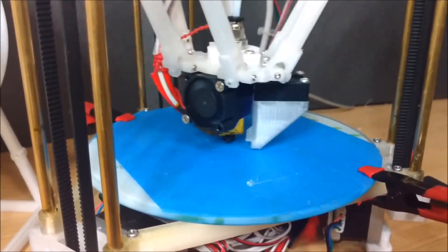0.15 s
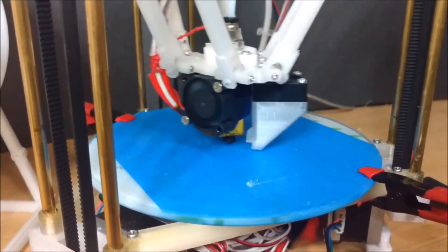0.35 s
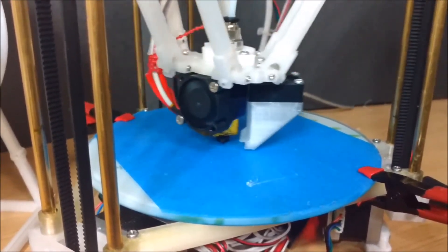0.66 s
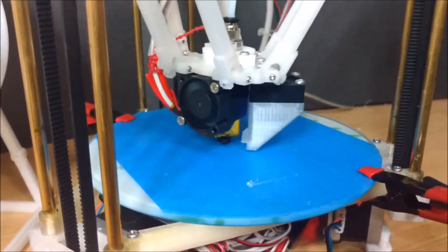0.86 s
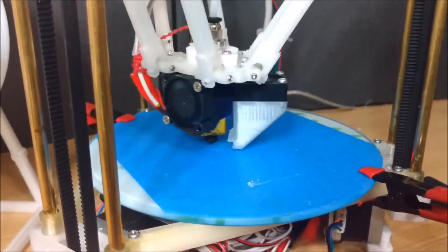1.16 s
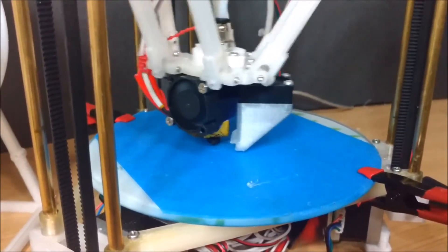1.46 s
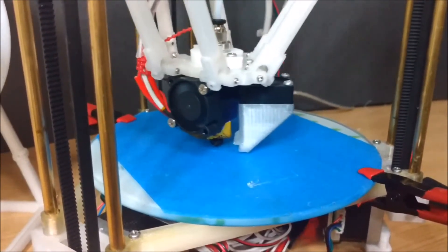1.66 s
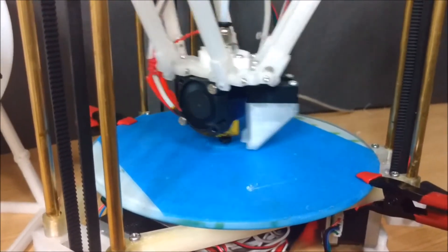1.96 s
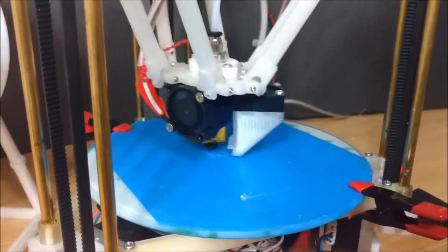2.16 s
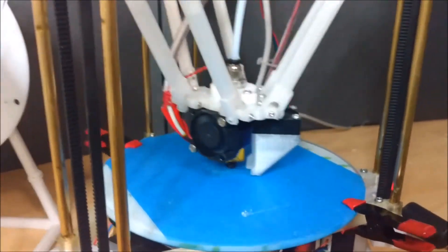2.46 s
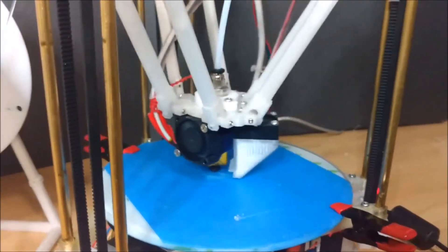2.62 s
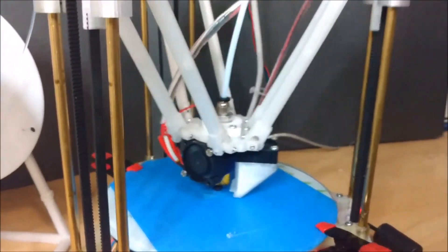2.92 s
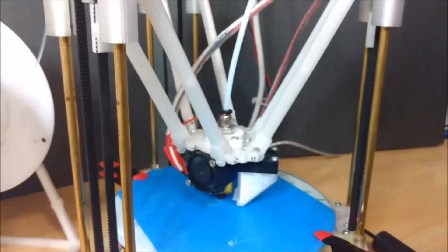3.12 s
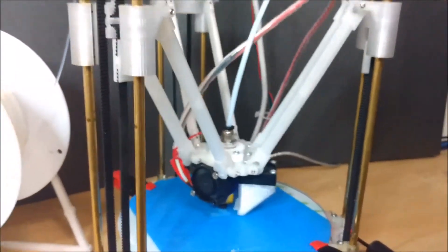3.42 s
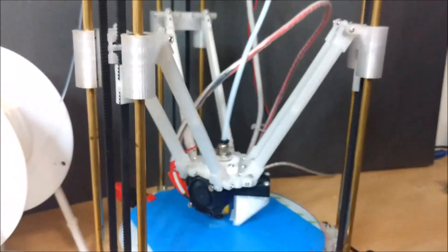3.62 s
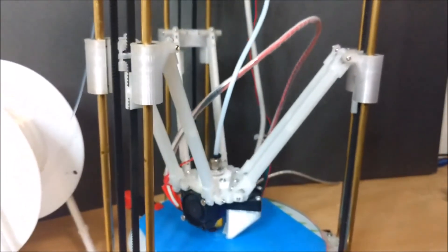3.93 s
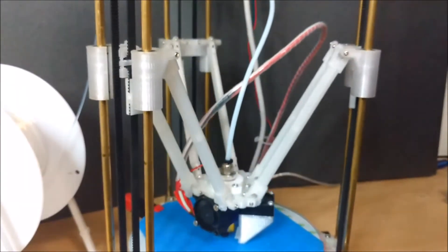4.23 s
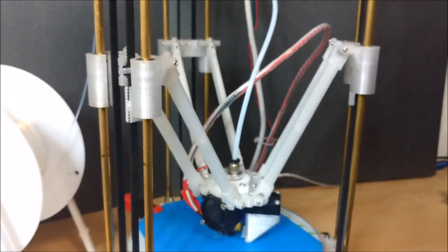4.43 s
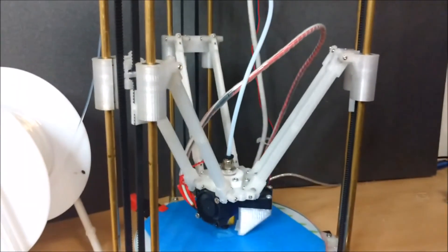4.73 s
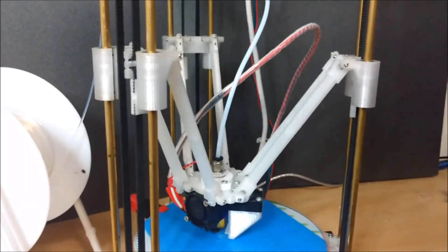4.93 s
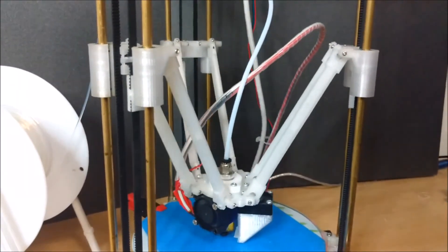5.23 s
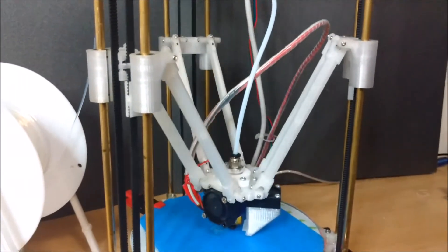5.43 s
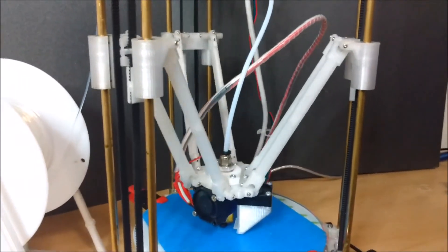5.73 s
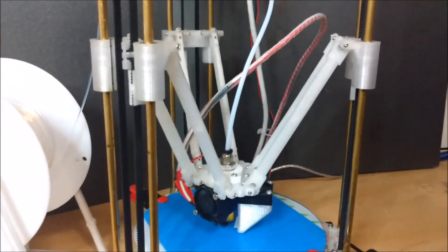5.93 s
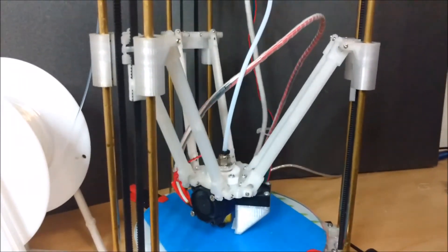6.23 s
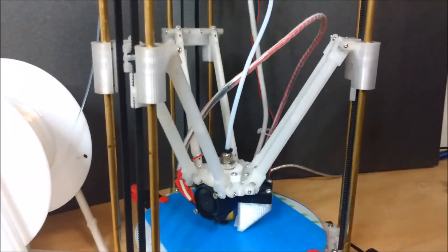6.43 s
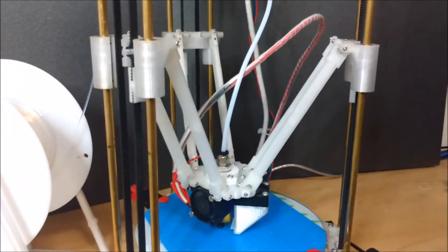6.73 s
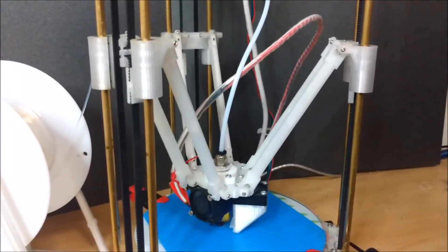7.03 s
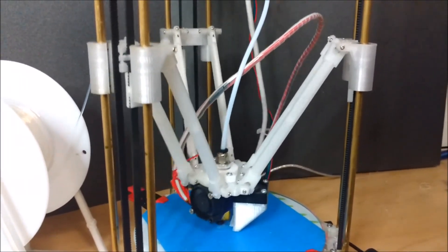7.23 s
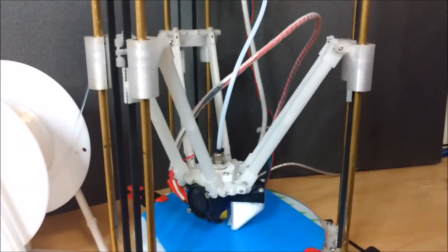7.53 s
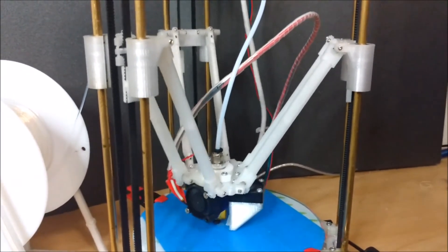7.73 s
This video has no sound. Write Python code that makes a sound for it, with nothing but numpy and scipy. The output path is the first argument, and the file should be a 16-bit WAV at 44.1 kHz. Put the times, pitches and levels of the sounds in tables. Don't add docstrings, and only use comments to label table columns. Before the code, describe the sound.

A desktop 3D printer with three towers is heard close up across a table, wide in stereo, with a very short room echo. A soft low fan rush runs throughout, with a barely audible whine. From 0 s the head makes brief strokes, about eight a second: each a low wavering motor hum near 185 Hz, with plastic arm buzz, bright metallic rattle and small dry knocks at reversals. The strokes quicken and weaken until 1.85 s. At 1.9 s a firmer run begins, again quickening, with a dull frame bump near 3.6 s. From 3.9 to 5.6 s it is quieter, lower-pitched and irregular, with a tiny scratchy bearing chirp around 4.2-4.4 s. At 5.7 s strong, fast paired strokes return, knocking most around 6.1 s, then gradually lengthening and spacing out to eight strokes a second, continuing to the end at about 7.9 s.

```python
import sys
import numpy as np
from scipy import signal
from scipy.fft import rfft, irfft, next_fast_len
from scipy.io import wavfile

SR = 44100
rng = np.random.default_rng(int(sys.argv[2]) if len(sys.argv) > 2 else 0)


def transcribe(u):
    v = np.clip(np.atleast_2d(u).T, -1, 1)
    q = np.round(v * 32767).astype(np.int16)
    wavfile.write(sys.argv[1], SR, q)


def field_ratio(decibels):
    return 10 ** (np.asarray(decibels, dtype=float) / 20)


N = 347067
HZ = np.maximum(np.fft.rfftfreq(next_fast_len(N + SR // 2), 1 / SR), 1)

# frequency_hz, density_db
FAN_SPECTRUM = [(25, 5), (80, -13), (130, 17.5), (300, 1), (1000, -16), (3000, -11.5), (6000, -32),
                (15000, -64)]
# frequency_hz, width_hz, level_db
BLADE_TONES = [(1488, 25, -60), (3023, 44, -55.5)]
# time_s, level_db
CREEP = [(0.0, -43), (0.39, -43), (1.1, -43.5), (1.84, -44.5), (1.99, -40), (2.35, -47), (2.76, -43.5),
         (3.29, -45.5), (3.72, -45.5), (4.2, -45.5), (4.36, -43.5), (4.43, -54.5), (4.54, -45),
         (4.93, -44.5), (5.6, -46), (5.87, -42.5), (6.6, -44), (7.87, -43)]
# mean_db, swing_ratio
CREEP_LAYERS = [
    (-46.5, 1.2),
    (-43, 1.3),
    (-47.5, 1.2),
]
# start_s, length_s, shake_db, hum_db
FILL_A = [(0.005, 0.035, -31, -28.5), (0.122, 0.087, -33, -34), (0.258, 0.061, -35, -31.5),
          (0.387, 0.084, -33.5, -32), (0.523, 0.043, -31.5, -33), (0.638, 0.064, -32, -33),
          (0.762, 0.034, -33.5, -29.5), (0.87, 0.038, -32.5, -29), (0.959, 0.054, -35.5, -38),
          (1.071, 0.034, -31, -32), (1.177, 0.028, -31.5, -31.5), (1.263, 0.032, -30.5, -33.5),
          (1.354, 0.034, -37, -34.5), (1.44, 0.025, -33.5, -38.5), (1.501, 0.05, -37, -38.5),
          (1.591, 0.06, -42.5, -46), (1.731, 0.051, -41, -43.5), (1.801, 0.057, -48, -41.5)]
# start_s, length_s, shake_db, hum_db
FILL_B = [(1.922, 0.063, -28.5, -36), (2.03, 0.054, -30, -33), (2.147, 0.063, -31.5, -36),
          (2.27, 0.048, -32, -33), (2.392, 0.05, -35, -36), (2.51, 0.071, -33.5, -39.5),
          (2.631, 0.047, -33.5, -34.5), (2.739, 0.033, -28.5, -34.5), (2.84, 0.039, -37, -32.5),
          (2.933, 0.041, -31, -33), (3.036, 0.027, -33, -32.5), (3.115, 0.033, -31.5, -34.5),
          (3.208, 0.026, -39.5, -32.5), (3.28, 0.029, -33.5, -34), (3.365, 0.023, -38, -50.5),
          (3.425, 0.033, -40.5, -41.5), (3.492, 0.031, -38, -49), (3.586, 0.027, -40, -31.5),
          (3.637, 0.014, -32, -38), (3.689, 0.048, -32.5, -37)]
# start_s, length_s, shake_db, hum_db
OUTLINE = [(3.928, 0.02, -54, -42.5), (4.02, 0.065, -48, -42.5), (4.107, 0.043, -42.5, -47),
           (4.228, 0.034, -40, -40.5), (4.326, .04, -55, -44.5), (4.465, 0.037, -40, -38.5),
           (4.583, 0.07, -49, -43), (4.676, 0.064, -51, -39.5), (4.775, 0.019, -33.5, -56.5),
           (4.833, 0.031, -37, -38.5), (5.035, 0.061, -44.5, -40), (5.134, 0.046, -40, -39.5),
           (5.226, .028, -36, -38.5), (5.308, 0.051, -37, -53.5), (5.408, 0.053, -40, -35.5),
           (5.502, 0.043, -45, -42.5), (5.573, 0.023, -41, -49)]
# start_s, length_s, shake_db, hum_db
FILL_C = [(5.678, 0.059, -33.5, -37), (5.738, 0.045, -30.5, -40), (5.822, 0.036, -30.5, -38),
          (5.875, 0.028, -32, -37.5), (5.945, .03, -34, -35.5), (5.988, 0.044, -31, -34),
          (6.087, 0.025, -28, -30), (6.14, 0.023, -27, -36), (6.214, 0.025, -29, -32.5),
          (6.262, 0.04, -30, -30.5), (6.347, .035, -31, -35.5), (6.4, 0.031, -33.5, -37),
          (6.474, 0.032, -32.5, -50), (6.518, 0.049, -30, -35), (6.61, 0.043, -31, -35.5),
          (6.658, 0.044, -31.5, -36.5), (6.747, 0.085, -30.5, -37), (6.877, 0.038, -32.5, -33.5),
          (6.931, 0.023, -30, -33), (7.008, 0.084, -31, -35), (7.15, 0.06, -32, -36.5),
          (7.264, 0.07, -30, -34.5), (7.39, .066, -34.5, -39), (7.497, 0.061, -31.5, -38),
          (7.598, .062, -33.5, -35.5), (7.714, 0.057, -29.5, -33.5), (7.818, 0.056, -31, -35.5)]
# moves, buzz_over_shake_db, rumble_db, pitch_hz, waver_ratio, three tower loads_db
PASSES = [
    (FILL_A, -0.4, -3, 186, 0.0361, 0, 0.1, 0.1),
    (FILL_B, -4, -2.6, 187, 0.04, 0.13, -0.1, 0.1),
    (OUTLINE, -5, 0.4, 150, 0.05986, 0.1, 1.11, -1.35),
    (FILL_C, -2, 0.99, 189, 0.0668, -1.7, 4.25, -5.5),
]
# left_lag_s, left_over_right_db
TOWERS = [(-.00013, -2.5), (.00003, 2.5), (.00017, -4)]
# frequency_hz, width_hz, level_db
FRAME_MODES = [(141.2, 11.6, 5.5), (189.6, 31.6, -1), (289.5, 74, -6.5), (329.6, 26, -6)]
# frequency_hz, width_hz, level_db
ARM_MODES = [(436, 16.6, 3.5), (545.5, 24.3, 0), (650, 40, 3), (973, 55, -3.5), (1081.5, 30, 2),
             (1200, 132, -3), (1398, 62, 3), (1513, 63, 0), (1697, 156, -7)]
# frequency_hz, width_hz, level_db
ROD_MODES = [(2170, 160, 8), (2800, 64, -18), (2990, 380, 21), (3630, 580, 4), (4944, 83, -22.5),
             (6000, 5800, -33.5)]
# frequency_hz, density_db
SCRAPE_SPECTRUM = [(200, 10), (700, 0), (1800, 0), (3500, 3), (6000, -2.5), (8000, -10), (11000, -11),
                   (15500, -42.5)]
# time_s, level_db
KNOCKS = [(0.131, -30), (0.3125, -27), (0.3605, -42), (0.394, -25), (0.4298, -17), (0.4708, -31),
          (0.5254, -26), (0.6332, -26), (0.6477, -24), (0.7477, -30), (0.7711, -30), (0.846, -32),
          (0.871, -22), (0.9567, -36), (1.073, -34), (1.084, -27), (1.124, -28), (1.1798, -31),
          (1.2635, -31), (1.276, -19), (1.3503, -30), (1.3769, -30), (1.4471, -30), (1.4994, -34),
          (1.733, -33), (1.9105, -25), (1.9295, -20), (2.036, -21), (2.156, -16), (2.2772, -20),
          (2.3298, -27), (2.389, -31), (2.5077, -38), (2.5225, -25), (2.585, -20), (2.6173, -32),
          (2.6344, -22), (2.749, -31), (2.793, -25), (2.8502, -27), (2.9392, -32), (3.045, -27),
          (3.08, -28), (3.1196, -29), (3.2205, -30), (3.2565, -35), (3.2764, -35), (3.2905, -30),
          (3.361, -34), (3.3729, -20), (3.3977, -36), (3.5047, -20), (3.5653, -21.5), (3.5957, -28),
          (3.647, -21), (3.696, -29), (3.714, -33), (3.7985, -23), (3.8372, -24.5), (3.8758, -39)]
# time_s, level_db
LATE_KNOCKS = [(3.9357, -27), (4.5816, -27), (4.5956, -30), (4.6803, -28), (4.7788, -38), (4.842, -37),
               (4.9482, -39), (5.1295, -22), (5.1591, -21.5), (5.219, -33), (5.234, -33), (5.2867, -32),
               (5.3245, -34), (5.413, -21), (5.449, -34), (5.501, -30), (5.5328, -25), (5.5571, -29),
               (5.6502, -26), (5.679, -37), (5.6915, -31), (5.7379, -23), (5.7594, -20), (5.8116, -39),
               (5.8293, -34), (5.9432, -24), (6.002, -30), (6.0766, -23), (6.097, -14), (6.1445, -31),
               (6.2126, -20), (6.2723, -23), (6.3345, -26), (6.3549, -33), (6.475, -26), (6.4892, -26),
               (6.5311, -21), (6.6081, -26), (6.6214, -20), (6.6618, -23), (6.7457, -17), (6.7842, -36),
               (6.8661, -36), (6.8827, -24), (7.013, -21), (7.1367, -21), (7.151, -28), (7.1764, -25),
               (7.2574, -20), (7.3856, -30), (7.4036, -25), (7.5012, -24.5), (7.5926, -30), (7.6196, -20),
               (7.6959, -26), (7.7145, -24.5), (7.7277, -27), (7.8141, -21)]
# time_s, level_db
SLIPS = [(4.2008, -36), (4.2093, -35), (4.2372, -23.5), (4.2408, -35), (4.2535, -34), (4.2614, -36),
         (4.2724, -37), (4.2844, -36), (4.301, -28), (4.313, -35), (4.3286, -32), (4.3381, -42),
         (4.3474, -38), (4.366, -42)]
# frequency_hz, width_hz, level_db
SLIP_MODES = [(3120, 65, 12.5), (6270, 340, -12)]

FAN_DB = -37
CREEP_MEAN_DB = -45
RISE_S, FALL_S, SAG_DB_PER_S = 0.0063, 0.01335, 4
RUMBLE_OF_HUM_DB = -6
HUM_DB, HUM_LAG_S, HUM_BUILD_HZ = 9.8, 0.0033, 18.18
OWN_MODES_DB = 6
POSE_DB, POSE_HZ = 2.5, 9
CLICK_DB, THUD_DB = -6, -13
KNOCK_S, SLIP_S = 0.002, 0.001
HARDEST_DB = -22
BUMP_S, BUMP_DB, BUMP_HZ, BUMP_WIDTH_HZ = 3.594, -24.5, 520, 500
SLIP_DB = 11
ROOM_T60_S, ROOM_DB = 0.13, -10.5
CROSS_S, CROSS_GAIN, CROSS_CUT_HZ = 0.00038, 0.85, 5300
TOP_HZ = 15300


def rms_one(x):
    return x / np.sqrt(np.mean(abs(x) ** 2) + 1e-20)


def through(x, response):
    size = 2 * (len(HZ) - 1)
    return irfft(rfft(x, size) * response, size)[..., :N]


def colour(points):
    hz, db = np.transpose(points)
    cepstrum = irfft(np.log(field_ratio(np.interp(np.log(HZ), np.log(hz), db))))
    cepstrum[1:len(HZ) - 1] *= 2
    cepstrum[len(HZ):] = 0
    return np.exp(rfft(cepstrum))


def modes(table):
    response = 0
    for k, (hz, width, db) in enumerate(table):
        detuning = (HZ / hz - hz / HZ) * hz / width
        response = response + (-1) ** k * field_ratio(db) / (1 + 1j * detuning)
    return response


def delay(s):
    return np.exp(-2j * np.pi * HZ * s)


def drift(hz):
    return rms_one(through(rng.standard_normal(N), 1 / (1 + 1j * HZ / hz) ** 2))


def ports(lag_s, pan_db):
    left = field_ratio(pan_db / 2) * delay(lag_s + 0.001)
    right = field_ratio(-pan_db / 2) * delay(0.001)
    return np.array([left, right])


def fan():
    shared, own = rng.standard_normal(N), rng.standard_normal((2, N))
    tint = colour(FAN_SPECTRUM)
    rush = through(shared, tint) + through(own, tint * (0.013 + 1 / (1 + 1500 / HZ)))
    tones = 0
    for hz, width, db in BLADE_TONES:
        tones = tones + field_ratio(db) * rms_one(through(shared, modes([(hz, width, 0)]) ** 2))
    return field_ratio(FAN_DB) * rms_one(rush) + tones


def printer():
    rattle, buzz, rumble, hum, (pitch_hz, waver, *loads_db) = effort()
    middle = field_ratio(HUM_DB) * motor_steps(hum, pitch_hz, waver) + frame_bump()
    out = through(middle, ports(0.00005, -0.26))
    for index, load_db in enumerate(loads_db):
        out += tower(index, rattle, buzz, rumble, load_db)
    return out


def effort():
    t = np.arange(N) / SR
    swing_db = np.interp(t, *np.transpose(CREEP)) - CREEP_MEAN_DB
    creeping = np.array([field_ratio(2 * (db + share * swing_db)) for db, share in CREEP_LAYERS])
    moving = np.zeros((3, N))
    held = np.zeros((6, N))
    for moves, buzz_db, *setting in PASSES:
        first = max(0, int((moves[0][0] - 0.03) * SR))
        held[:, first:] = np.c_[setting]
        for s, length, shake_db, hum_db in moves:
            near = slice(max(0, int((s - 0.05) * SR)), int((s + length + 0.1) * SR))
            rise = 1 / (1 + np.exp((s - t[near]) * 2 / RISE_S))
            fall = 1 / (1 + np.exp((t[near] - s - length) * 2 / FALL_S))
            sagging_db = shake_db - SAG_DB_PER_S * (t[near] - s - length / 2)
            levels_db = np.array([sagging_db, sagging_db + buzz_db, np.full_like(rise, hum_db)])
            moving[:, near] += field_ratio(2 * levels_db) * (rise * fall) ** 2
    rattle, buzz, rumble = np.sqrt(creeping + moving * field_ratio(2 * np.c_[[0, 0, RUMBLE_OF_HUM_DB]]))
    build_up = delay(HUM_LAG_S) / (1 + 1j * HZ / HUM_BUILD_HZ)
    hum = abs(through(np.sqrt(moving[-1]), build_up))
    return rattle, buzz, rumble * field_ratio(held[0]), hum, held[1:]


def motor_steps(hum, pitch_hz, waver):
    sag = 0.08 / (1 + hum / 0.009)
    pace_hz = pitch_hz * (1 - sag + waver * drift(20))
    turn = 2 * np.pi * np.cumsum(pace_hz) / SR
    return hum * field_ratio(2.0 * drift(66)) * (np.sin(turn) + 0.01 * np.sin(2 * turn))


def tower(index, rattle, buzz, rumble, load_db):
    metal = rms_one(modes(ROD_MODES) + field_ratio(6.5) * colour(SCRAPE_SPECTRUM))
    favoured = [(hz, width, db + OWN_MODES_DB * (k % len(TOWERS) == index))
                for k, (hz, width, db) in enumerate(ARM_MODES)]
    plastic_rms = np.sqrt(np.mean(abs(modes(ARM_MODES)) ** 2))
    bodies = np.array([metal, modes(favoured) / plastic_rms, modes(FRAME_MODES)])

    hits = knocks((KNOCKS + LATE_KNOCKS)[index::3], KNOCK_S)
    rods = field_ratio(-5.0) * rattle * grains(2400, spread_db=3.5, clump_db=3.8)
    rods += field_ratio(CLICK_DB) * signal.lfilter([1, -0.5], [1], hits)
    pose_db = load_db + POSE_DB * drift(POSE_HZ)
    arms = field_ratio(-14.0 + pose_db) * buzz * grains(900, spread_db=1.5, clump_db=0.5)
    arms += field_ratio(THUD_DB) * hits
    shudder = field_ratio(27.0) * rumble * rng.standard_normal(N)
    body_sound = through(np.array([rods, arms, shudder]), bodies).sum(axis=0)
    return through(body_sound, ports(*TOWERS[index]))


def grains(per_s, spread_db, clump_db):
    sizes = field_ratio(spread_db * np.minimum(rng.exponential(1, N), 4)) * rng.choice([-1, 1], N)
    contacts = rng.random(N) < per_s / SR
    return rms_one(sizes * contacts * field_ratio(clump_db * drift(57.0)))


def room(x):
    t = np.arange(SR // 3) / SR
    shared, own = rng.standard_normal(len(t)), rng.standard_normal((2, len(t)))
    dying = field_ratio(-60 * t / ROOM_T60_S) * (t > 0.003)
    size = 2 * (len(HZ) - 1)
    unlike = 1 / (1 + (500 / HZ) ** 2)
    echoes = np.sqrt(1 - unlike) * rfft(shared * dying, size)
    echoes = echoes + np.sqrt(unlike) * rfft(own * dying, size)
    return through(x, echoes / np.sqrt(np.sum(dying ** 2)) / (1 + 1j * HZ / 6000))


def knocks(rows, dying_s):
    t = np.arange(SR // 30) / SR
    clicks = np.zeros(N + SR)
    bursts = rng.standard_normal((len(rows), len(t))) * np.exp(-t / dying_s)
    for (s, db), burst in zip(rows, bursts):
        clicks[round(s * SR):][:len(t)] += field_ratio(min(db, HARDEST_DB)) * burst
    return clicks[:N]


def frame_bump():
    blow = np.arange(N) == round((BUMP_S + 0.001) * SR)
    return through(field_ratio(BUMP_DB + 32.5) * blow, modes([(BUMP_HZ, BUMP_WIDTH_HZ, 0)]) ** 2)


def bearing():
    slips = field_ratio(SLIP_DB) * knocks(SLIPS, SLIP_S)
    return through(slips, modes(SLIP_MODES) * ports(0.00003, -1.1))


def scene():
    near = printer() + bearing()
    return near + field_ratio(ROOM_DB) * room(near) + fan()


def low_pass(x):
    return signal.sosfilt(signal.butter(12, 15720, fs=SR, output="sos"), x)


def record(dry):
    cross = CROSS_GAIN * delay(CROSS_S) / (1 + 1j * HZ / CROSS_CUT_HZ)
    wide = dry - through(dry[::-1], cross)
    wide = through(wide, 1 / (1 + 95 / (1j * HZ)) ** 2)
    wide = signal.sosfilt(signal.butter(16, TOP_HZ, fs=SR, output="sos"), wide)
    return low_pass(wide)


dry = scene()
out = record(dry)
transcribe(out)
```